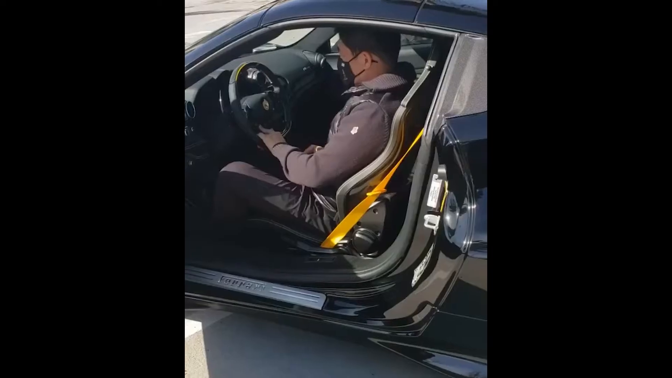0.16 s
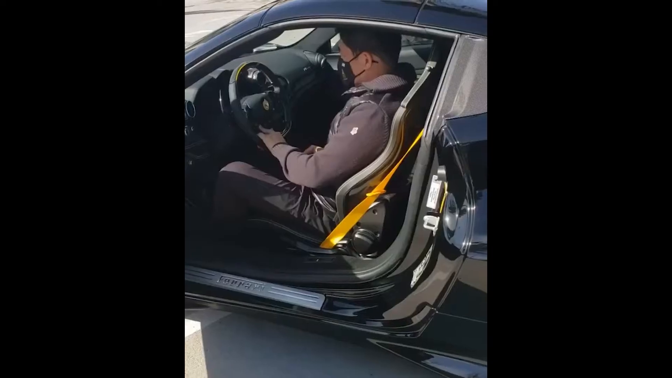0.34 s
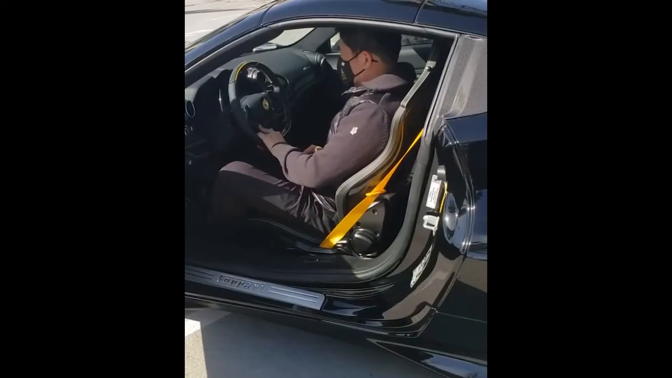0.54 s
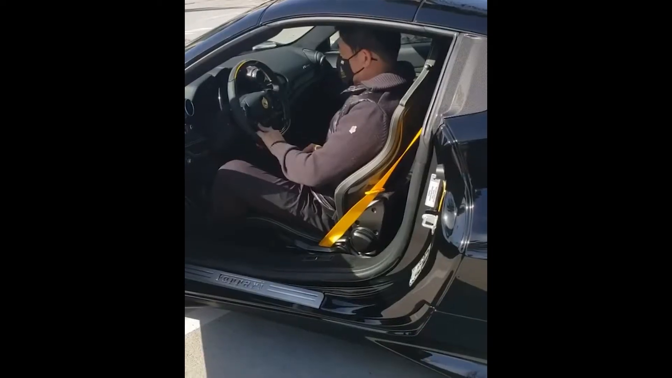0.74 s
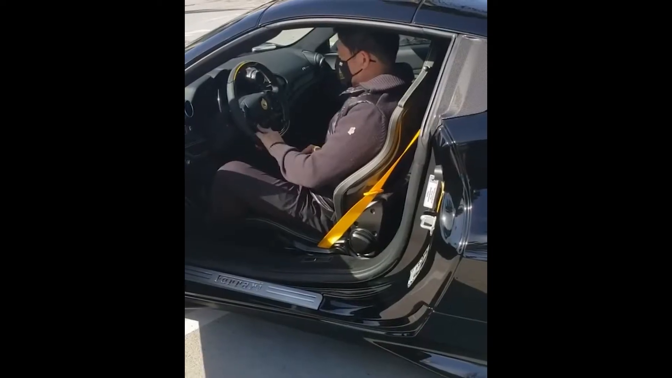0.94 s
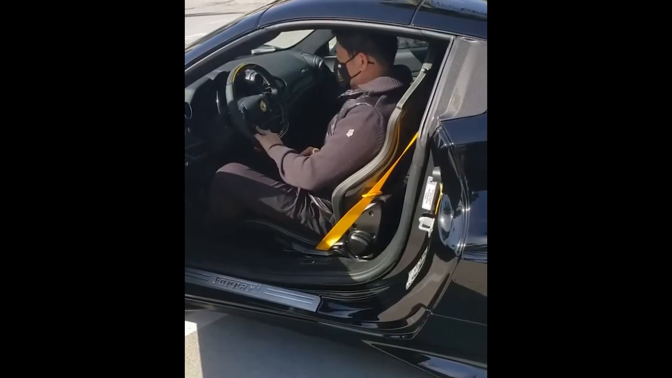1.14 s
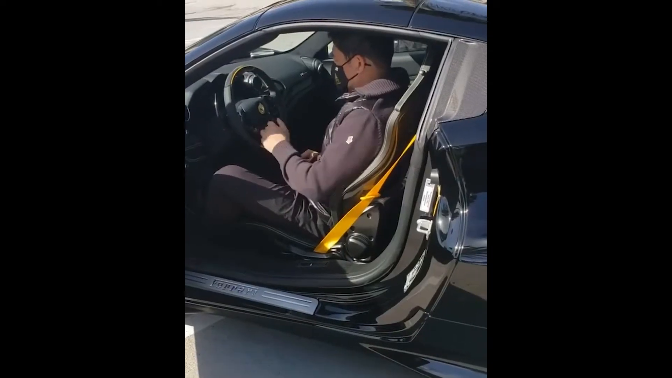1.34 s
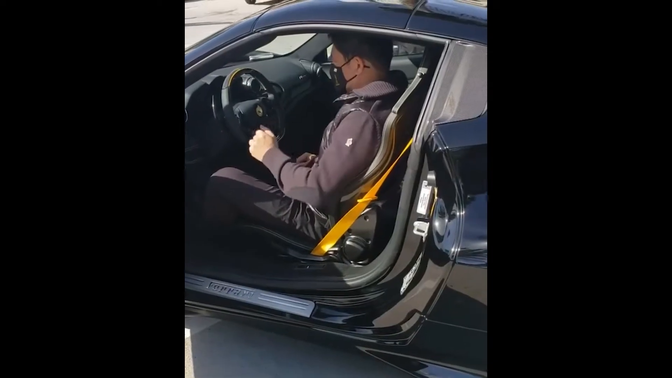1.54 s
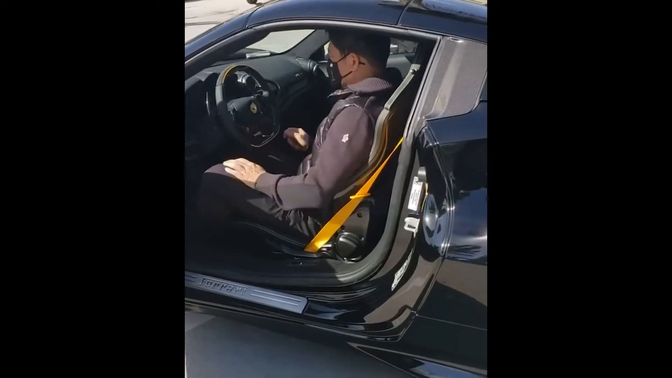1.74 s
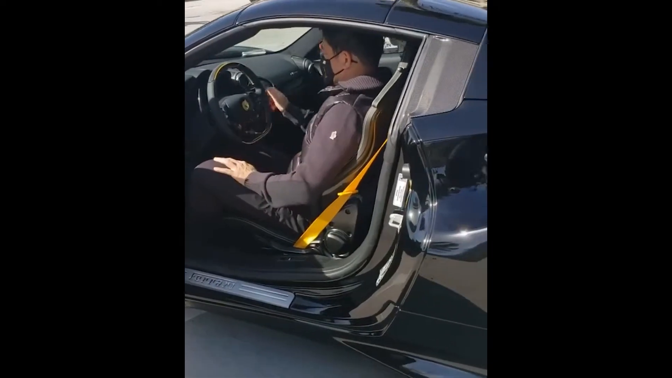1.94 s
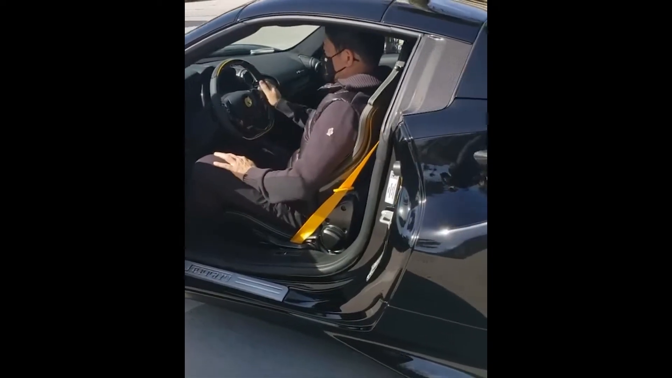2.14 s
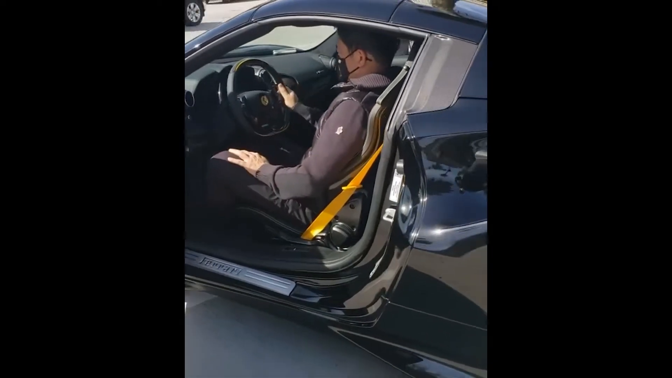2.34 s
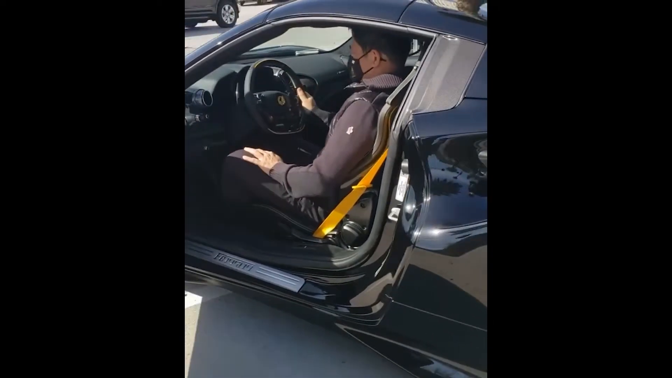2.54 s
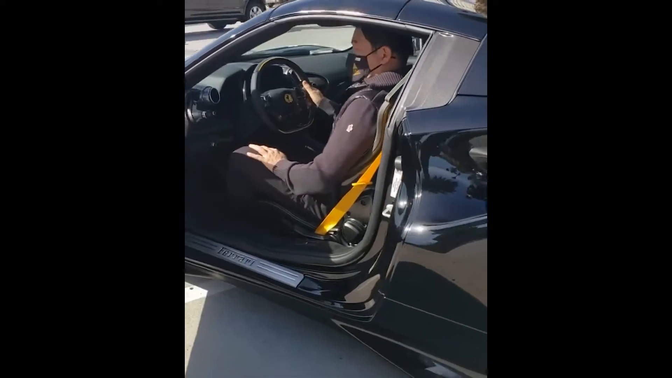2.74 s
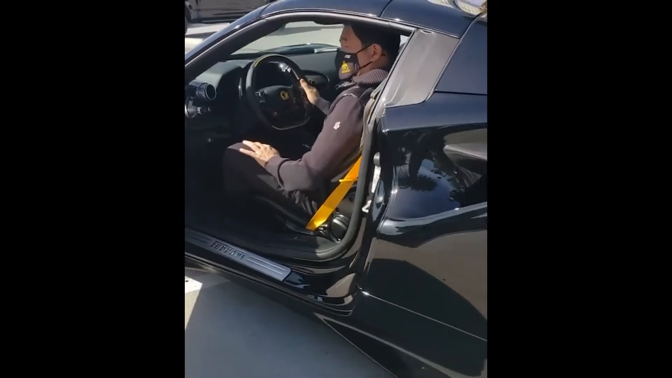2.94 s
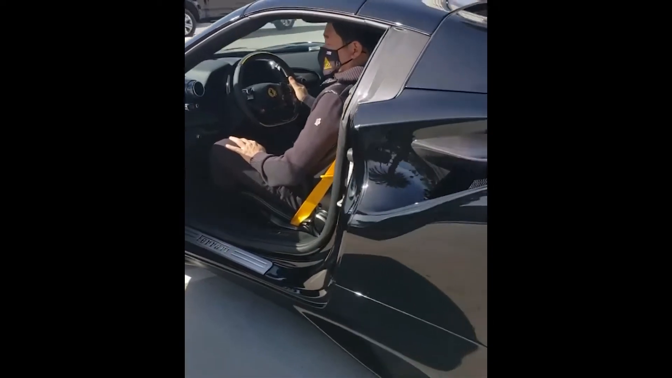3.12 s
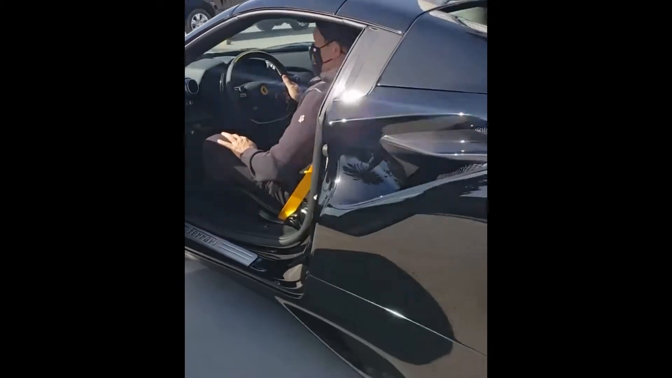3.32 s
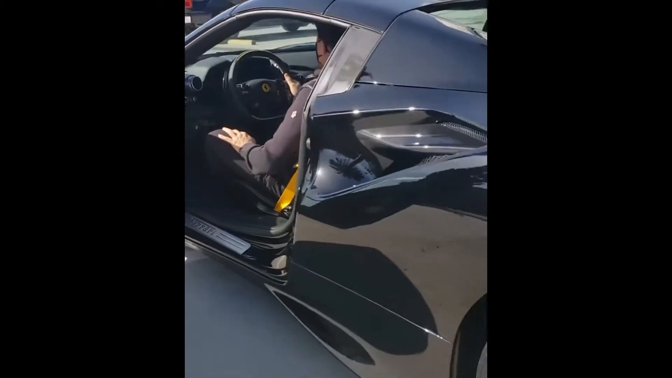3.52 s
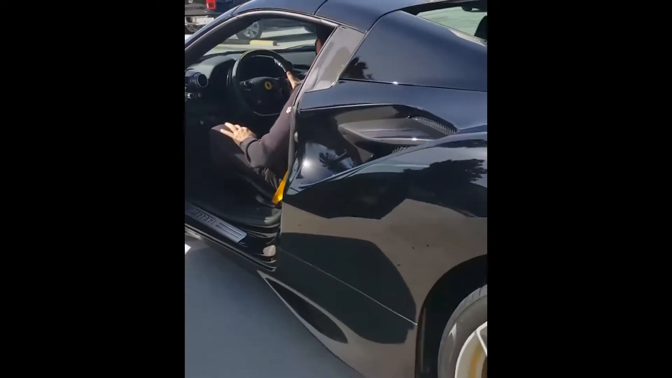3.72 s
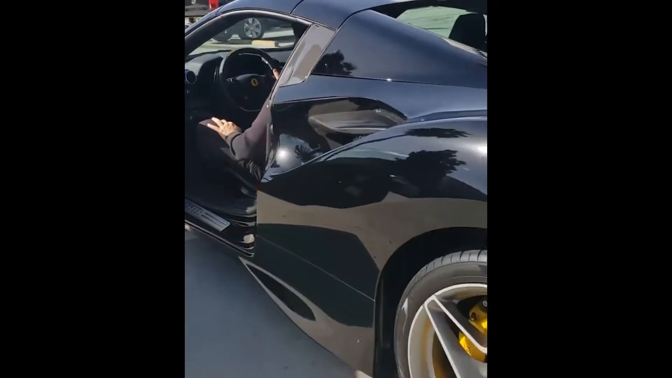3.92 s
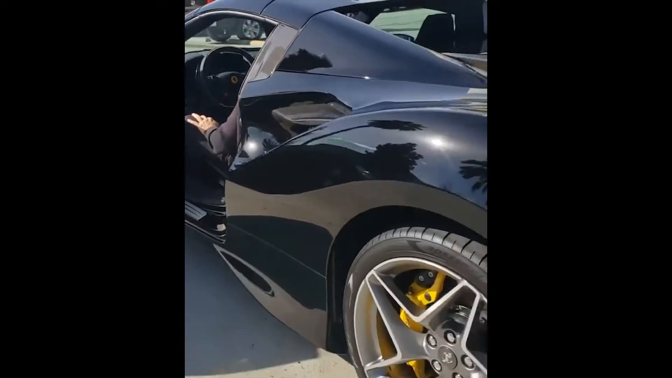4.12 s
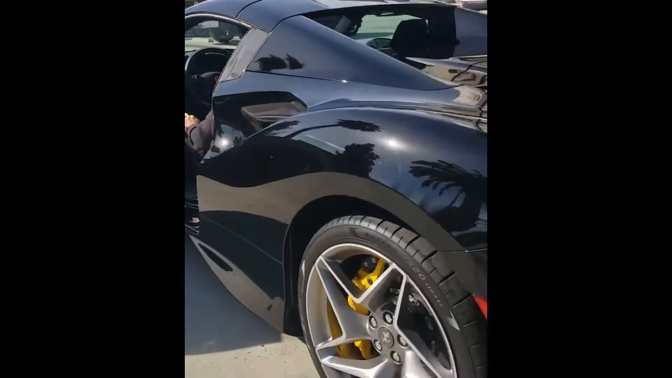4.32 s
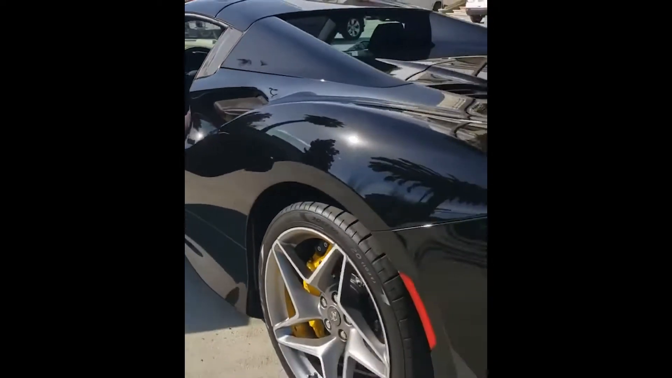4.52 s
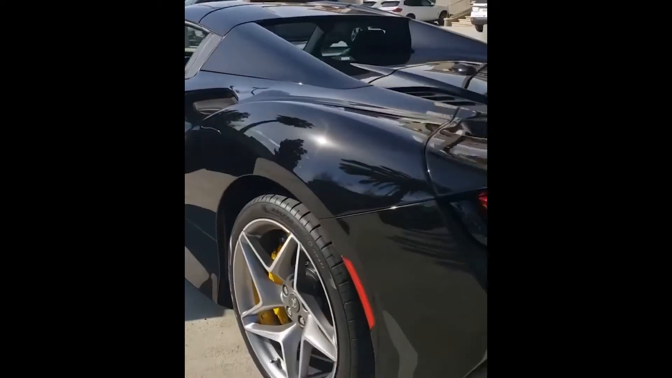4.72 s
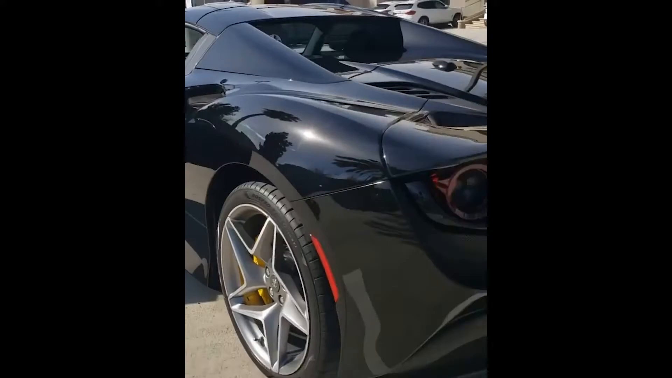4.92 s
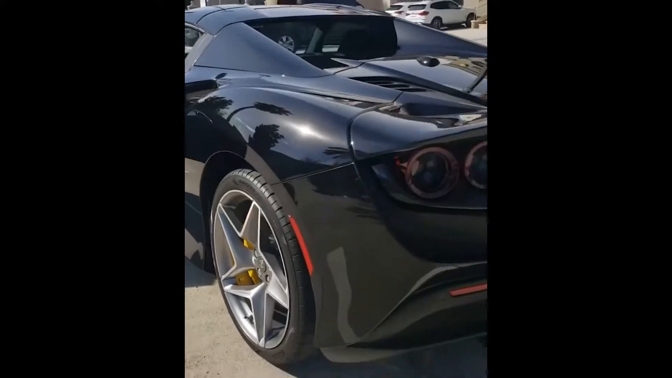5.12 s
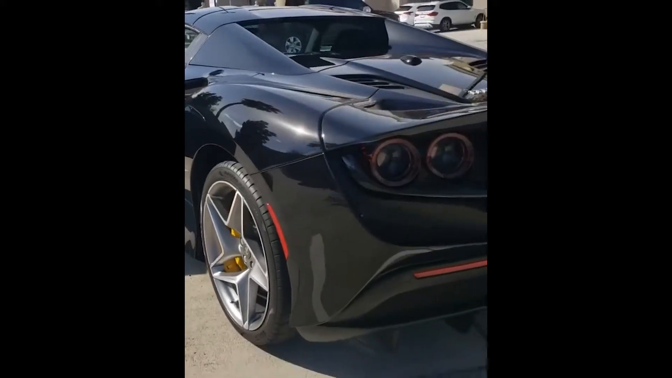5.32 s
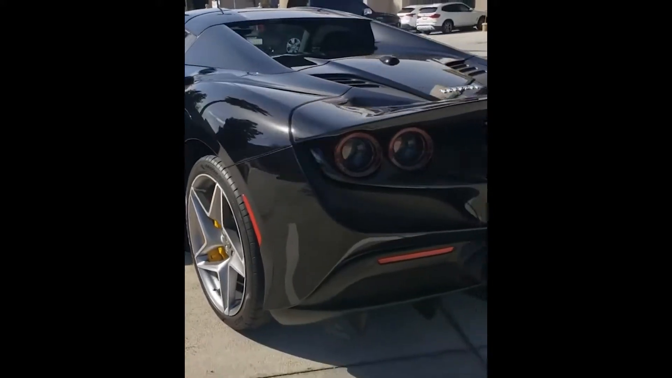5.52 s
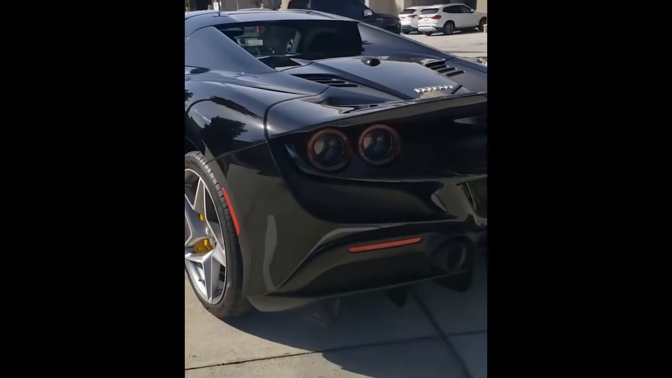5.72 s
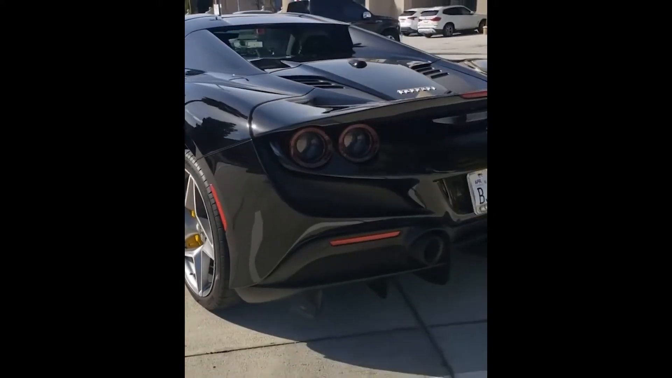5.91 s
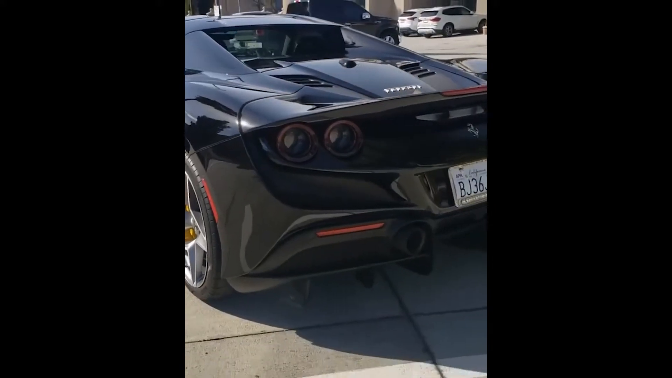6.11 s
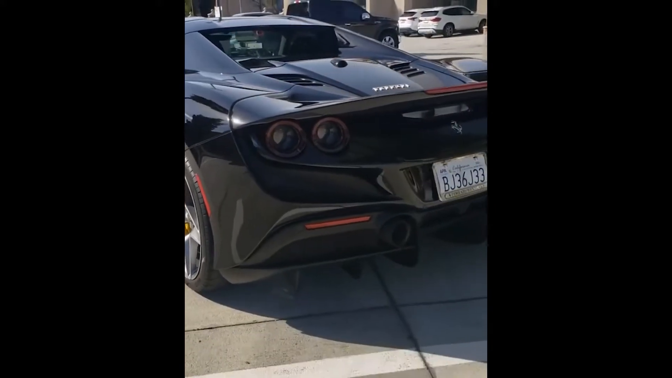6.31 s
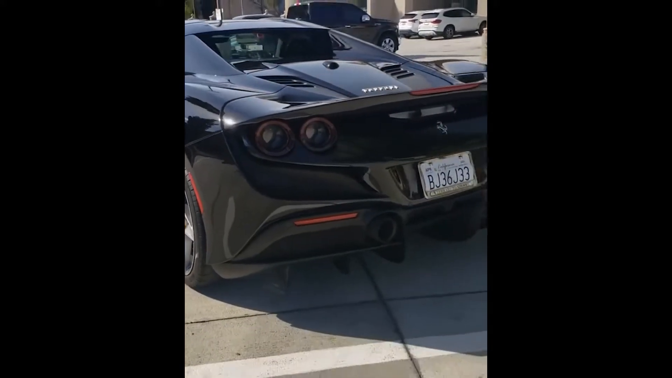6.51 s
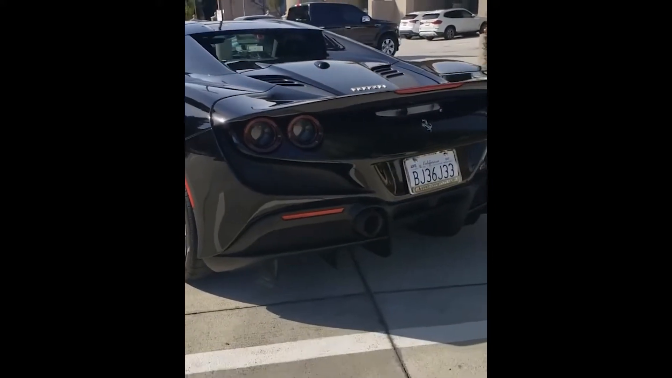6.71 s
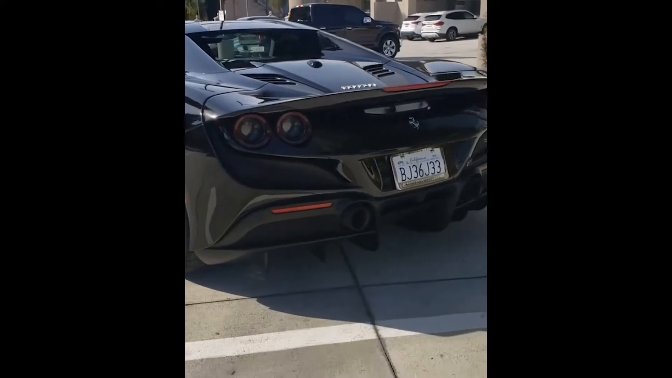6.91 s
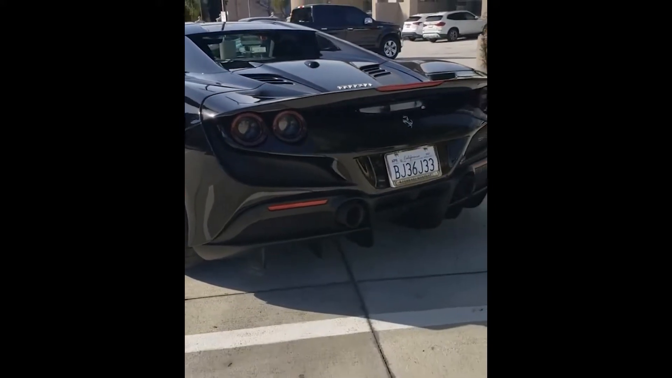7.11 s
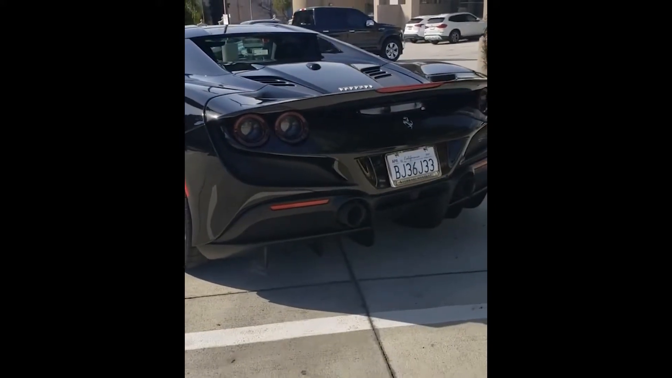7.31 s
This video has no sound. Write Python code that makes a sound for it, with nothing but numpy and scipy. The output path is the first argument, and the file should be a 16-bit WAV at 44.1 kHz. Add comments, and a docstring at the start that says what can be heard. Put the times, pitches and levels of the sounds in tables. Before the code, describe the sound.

An outdoor parking lot, with a soft low hum and bassy distant traffic. At about 0.55 s a starter clashes metallically and grinds with a gritty whir, pulsing with the compression strokes. Around 1.03-1.1 s heavy exhaust thumps mark a V8 catching; it flares to a peak near 1.4 s, then sinks by 2 s into a fast, deep, fluttering idle with valve ticking and fine hiss. From 3.4 to 5.2 s the stereo microphone walks from open door to tailpipes: the hollow rasp grows, reflections shift its colour, and small dry pops scatter, clustering around 4.3-5.6 s. A sharp click comes at 5.26 s. At 5.8 s the throttle opens; pitch climbs rapidly to a raspy snarl near 6.5 s. It shuts, revs falling with a thin descending turbo whistle, low burbles around 6.9 s and a loud pop at 7.0 s, still coasting down at the 7.35 s end.

```python
"""A low hum and distant traffic lie over a parking lot; then a starter clashes and grinds, and a twin-turbo V8 catches.
The engine flares and settles to a fast idle while the listener walks from the open door to the tailpipes.
A throttle blip brings a snarl, then burbles, pops and a fading turbo whistle.
One count of firings times the engine: harmonics make the boom, ringing pipes and gas noise the rasp.
Shaped noise makes the hiss, grind and traffic; short decays make the pops, gas slugs and click."""
import sys
import numpy as np
from scipy import signal
from scipy.fft import rfft, irfft, next_fast_len
from scipy.io import wavfile
from scipy.ndimage import uniform_filter1d, minimum_filter1d, map_coordinates

SR = 44100
rng = np.random.default_rng(int(sys.argv[2]) if len(sys.argv) > 2 else 0)


def dump(signal):
    """Clip the signal to [-1, 1] and save it as 16-bit WAV at the path in sys.argv[1]."""
    limited = np.clip(np.atleast_2d(signal).T, -1, 1)
    pcm = np.round(limited * 32767).astype(np.int16)
    wavfile.write(sys.argv[1], SR, pcm)


N = 324339
FUEL_CUT_S, CUT_FALL_S, RESUME_S = 6.88, 0.1, 1  # start of the fuel cut, time to fall, time to return


def amp(db):
    """Turn decibels into a gain."""
    return np.exp(np.log(10) * np.asarray(db) / 20)


def unit(x):
    """Scale to an rms (average strength) of 1."""
    return x / np.sqrt(np.mean(x ** 2) + 1e-20)


def clock():
    """The time of each sample, in seconds."""
    return np.arange(N) / SR


def along(points, hz):
    """Read a curve of (frequency, value) points on a log frequency axis."""
    f, v = np.transpose(points)
    return np.interp(np.log(hz + 1), np.log(f + 1), v)


def curves(rows):
    """Turn each column after the time into one value per sample."""
    s, *cols = np.transpose(rows)
    return [np.interp(clock(), s, c) for c in cols]


def ramp(start, end):
    """Rise from 0 to 1 between two times."""
    return np.clip((clock() - start) / max(end - start, 1 / SR), 0, 1)


def swells(rows):
    """Add up bell-shaped swells from rows of peak time, level and half-length."""
    return sum(amp(db) * np.exp(-((clock() - s) / width) ** 2 / 2) for s, db, width in rows)


def filtered(x, response):
    """Pass x through a filter given as a gain for each frequency."""
    m = next_fast_len(N + SR // 2)
    return irfft(rfft(x, m) * response(np.fft.rfftfreq(m, 1 / SR)), m)[..., :N]


def modes(rows, hz):
    """Response of several resonances, each given by its frequency, width and level."""
    total = 0
    for k, (center, width, db) in enumerate(rows):
        damping = 1j * hz * width
        total = total + (-1) ** k * amp(db) * damping / (center * center - hz * hz + damping)
    return total


def per_firing(cycle):
    """A smooth random curve with one new value each time the count goes up by one."""
    return map_coordinates(rng.standard_normal(int(cycle[-1]) + 4), [cycle], order=2)


# how alike the noise is at the two ears: (frequency [Hz], coherence [-1 to 1])
EAR_LIKENESS = [(200, 1), (500, 1), (1000, 0.58), (2000, 0.056), (4000, 0.028), (12000, 0.039)]


def rush(spectrum):
    """Stereo noise with a given spectrum: the same at both ears in the bass, wide in the treble."""
    def turn(hz):
        return np.arccos(np.clip(along(EAR_LIKENESS, hz), -1, 1)) / 2

    def mid_and_side(hz):
        return amp(along(spectrum, hz)) * [np.cos(turn(hz)), np.sin(turn(hz))]

    mid, side = filtered(rng.standard_normal((2, N)), mid_and_side)
    return np.array([mid + side, mid - side]) / np.std(mid)


def spread(x, wet_db=-9):
    """Ground and bodywork scatter a short, different tail to each ear."""
    t = np.arange(SR // 4) / SR
    tail = rng.standard_normal((2, len(t))) * amp(-60 * t / .08)  # dies by 60 dB in 0.08 s
    return x + amp(wet_db) * signal.fftconvolve(x[None], tail / np.linalg.norm(tail[0]), axes=1)[:, :N]


def walked():
    """Where the listener is: 0 at the open door, about 0.5 at the rear wheel, 1 behind the car."""
    return ramp(3.42, 5.15)


# how fast one bank of cylinders fires, twice the crank speed: (time [s], firing rate [Hz])
BANK_RATE = [(1.1, 44.98), (1.15, 60.94), (1.22, 72.6), (1.38, 83.05), (1.52, 77.3), (1.74, 61.7),
             (1.93, 56.32), (2.23, 56.06), (2.44, 53.72), (2.98, 52.58), (3.17, 49.25), (3.47, 53.26),
             (3.95, 50.77), (5.19, 52.05), (5.75, 51.25), (5.87, 61.74), (6.08, 100.2), (6.2, 121.9),
             (6.3, 145.4), (6.4, 172), (6.462, 194), (6.58, 192.5), (6.93, 162.1), (7.09, 131.3),
             (7.35, 101.7)]


def firing_rate():
    """Firings per second of one bank, which set the pitch of the engine."""
    return curves(BANK_RATE)[0]


def revs(idle_hz=52):
    """Engine speed in octaves above idle."""
    return np.log2(firing_rate() / idle_hz)


# the throttle for the start-up flare, then the blip:
# (starts opening [s], fully open [s], starts shutting [s], opening [0-1])
THROTTLE_MOVES = [(1.0, 1.126, 1.45, .4), (5.8, 6.278, 6.55, 1)]
SHUT_S = 0.12  # time the throttle takes to close


def load():
    """How far the throttle is open, 0-1."""
    total = 0
    for opens, full, shuts, opening in THROTTLE_MOVES:
        total = total + opening * ramp(opens, full) * (1 - ramp(shuts, shuts + SHUT_S))
    return np.clip(total, 0, 1)


def overrun():
    """Rises to 1 as the blip ends and the engine coasts down."""
    shuts = THROTTLE_MOVES[-1][2]
    return ramp(shuts, shuts + SHUT_S)


def starved():
    """How much of the fuel is cut, 0-1; it falls away quickly and is slowly fed back in."""
    empty = FUEL_CUT_S + CUT_FALL_S
    return ramp(FUEL_CUT_S, empty) * (1 - ramp(empty, empty + RESUME_S))


# noise colour of the distant traffic: (frequency [Hz], relative level per Hz [dB])
TRAFFIC_COLOUR = [(20, -11), (60, 1.5), (145, 0), (550, -11), (1400, -17.5), (6000, -36.5), (7500, -44),
                  (13000, -47)]


def parking_lot(air_db=-37.5, hum_hz=143, hum_db=-39):
    """Distant traffic is bassy noise, with a low wavering tone for the hum."""
    hum = np.sin(2 * np.pi * hum_hz * clock() + 0.49 * per_firing(10 * clock()))
    return amp(air_db) * rush(TRAFFIC_COLOUR) + amp(hum_db) * hum


# the starter's clashes: (time [s], level [dB], decay time [s])
TOOTH_CLASHES = [(0.553, -22, 0.021), (0.567, -22, 0.013), (0.894, -27, 0.018), (0.957, -33, 0.019),
                 (0.984, -34, 0.0067)]


def clashes(rise_s=0.0046):
    """The loudness of the clashing teeth: each clash strikes hard and dies away."""
    out = 0
    for s, db, decay_s in TOOTH_CLASHES:
        t = np.maximum(clock() - s, 0)
        out = out + amp(db) * (1 - np.exp(-(t / rise_s) ** 2)) * np.exp(-t / decay_s)
    return out


# ringing of the engine's metal parts: (frequency [Hz], width [Hz], relative level [dB])
METAL_RINGS = [(3350, 33, 2.5), (4730, 35, 4.5), (5240, 44, -1), (5640, 42, -3.5)]


def metal():
    """Noise shakes the metal parts, which ring steadily at their own pitches."""
    return unit(filtered(rng.standard_normal((2, N)), lambda hz: modes(METAL_RINGS, hz)))


def churned(x, patchy_db):
    """The colour shifts from moment to moment, as different teeth and parts ring."""
    z = signal.stft(x, nperseg=512)[2]
    field = uniform_filter1d(rng.standard_normal(z.shape[1:]), size=4, axis=0)  # smooth over frequency
    field = uniform_filter1d(field, size=7, axis=1)  # smooth over time
    return signal.istft(z * amp(patchy_db * unit(field)), nperseg=512)[1][:, :N]


# noise colour of the grinding gears: (frequency [Hz], relative level per Hz [dB])
GRIND_COLOUR = [(150, -5), (400, 2), (700, -8), (1020, 0), (1400, -4.5), (2400, -7), (3400, -7),
                (4800, -4.5), (5800, -10.5), (7500, -9.5), (9000, -16.5), (13000, -15.5)]
# ringing of the starter's ring gear: (frequency [Hz], width [Hz], relative level [dB])
GEAR_RINGS = [(1440, 180, 3.5), (3320, 400, -1.5), (3950, 120, 2), (4580, 120, 4), (5340, 190, 2),
              (6270, 210, -2)]


def starter(grind_db=-38, ring_db=-8, whir_hz=1050, whir_db=-11, whir_waver=1.6, stroke_hz=10.7,
            labour_db=1.2, spin_up_db=2, gear_db=-1, scrape_db=-5):
    """The pinion clashes and grinds on the ring gear over a whir, labouring at each compression stroke.

    The grind fades as the engine runs away from it."""
    strokes = np.cos(2 * np.pi * stroke_hz * (clock() - GAS_SLUGS[0][0]))
    grind = amp(grind_db + labour_db * strokes + spin_up_db * ramp(.9, 1.02))
    grind = grind * ramp(.545, .6) * (1 - ramp(1.03, 1.18))
    # quick and slow random changes in strength
    teeth = unit(amp(1.9 * per_firing(260 * clock()) + .5 * per_firing(25 * clock())))
    whir = amp(whir_db) * np.sin(2 * np.pi * whir_hz * clock() + whir_waver * per_firing(90 * clock()))
    scrape = rush([(300, 7.0), (1500, 3), (2300, -23), (3500, -7.0), (13000, -2.5)])
    gear = unit(filtered(rng.standard_normal((2, N)), lambda hz: modes(GEAR_RINGS, hz)))
    mesh = churned(rush(GRIND_COLOUR) + amp(ring_db) * metal(), patchy_db=2.8)
    clash = clashes() * (amp(gear_db) * gear + amp(scrape_db) * scrape)
    return teeth * (grind * (mesh + whir) + clash)


# the catch, and single slugs of gas in the pipes from cranking to coasting:
# (time [s], level [dB], ring frequency [Hz], time to die by 60 dB [s])
GAS_SLUGS = [(0.713, -12, 74.2, 0.27), (0.806, -20, 75, 0.25), (1.027, -1, 82.6, 0.17),
             (1.061, 2, 62, 0.19), (1.092, 6, 82, .08), (6.24, 7, 80, 0.048), (6.312, -2.5, 79, 0.079),
             (6.48, 3, 91, 0.096), (6.879, 2, 80, 0.098), (6.905, -3, 149.9, 0.11), (6.981, -7, 71.9, 0.16)]


def thumps(rise_s=0.0085):
    """A slug of gas swells and rings out at the exhaust's lowest resonance."""
    out = np.zeros(N)
    for s, db, hz, t60 in GAS_SLUGS:
        t = np.maximum(clock() - s, 0)
        swell = amp(db - 60 * t / t60) * (1 - np.exp(-(t / rise_s) ** 2))
        out -= swell * np.sin(2 * np.pi * hz * t)
    return out


# resonances of the tailpipes: (frequency [Hz], width [Hz],
# relative level at the door [dB], at the rear wheel [dB], behind [dB])
PIPE_RINGS = [(403, 41, -6, -56, -8), (508, 44, -12.5, -11, -6), (643, 77, -4, 1, -1.5),
              (752, 41, -3.5, -8.5, -6.5), (826, 43, -11, -24, 1.5), (930, 86, -35, -31.5, -5),
              (1128, 380, -18, -27, -11.5), (1336, 160, -24, -24, -27)]


def tailpipes(x, cut_hz=1450, drift_db=2, drift_hz=3):
    """The pipes ring, balanced by where the listener is; each ring drifts, the whole keeps a steady level."""
    where, heard = walked(), 0
    for k, (hz, width, *heard_db) in enumerate(PIPE_RINGS):
        knots = rng.standard_normal(N // SR * 10)
        drift = np.interp(drift_hz * clock(), np.arange(len(knots)), knots)
        gain = amp(np.interp(where, [0, .5, 1], heard_db) + drift_db * drift)
        heard = heard + (-1) ** k * gain * signal.lfilter(*signal.iirpeak(hz, hz / width, fs=SR), x)
    ring = signal.sosfilt(signal.butter(N=6, Wn=cut_hz, fs=SR, output="sos"), heard)
    power = np.abs(uniform_filter1d(ring ** 2, size=SR // 5))
    return ring / np.sqrt(power + 1e-12)


# the exhaust barks as the load changes: (peak time [s], added level over the rasp [dB], half-length [s])
LOAD_BARKS = [(1.61, -9, 0.038), (2.15, -6.5, 0.12), (3.62, -12, 0.15), (6.285, -3, 0.017)]


def rasp_level(door_db=-41.0, behind_db=5.0, octave_db=1, load_db=7.5, load_power=4, starved_db=-10):
    """The rasp grows towards the tail and with speed there, and leaps out near full throttle."""
    db = door_db + behind_db * np.sqrt(walked()) + octave_db * revs() * walked()
    db = db + load_db * load() ** load_power + starved_db * starved()
    return amp(db) * (1 + swells(LOAD_BARKS)) * np.sqrt(ramp(0.95, 1.28))


# noise colour of the gas rushing out: (frequency [Hz], relative level per Hz [dB])
GAS_COLOUR = [(150, -23), (260, -11), (380, -27), (520, 1.5), (650, 6), (900, 9), (1300, -2.5),
              (1600, -17.5), (2500, -14), (5000, -38)]
# the four cylinders of a bank fire unequally: [relative level in dB]
CYLINDER_LEVELS = [2, -0.5, 1, 3]


def rasp(cycle, clean, uneven, scatter_db=1.7, other_bank_db=-7, jitter_s=0.00062, pulse_db=-1.0,
         flow_db=-2, hollow_db=-2, puff_depth=0.94):
    """Each firing's sharp front rings the tailpipes and pushes out a puff of turbulent gas."""
    at = np.flatnonzero(np.diff(np.floor(np.maximum(2 * cycle - .65, 0))))  # firings of both banks
    size, delay = rng.standard_normal((len(at), 2)).T
    shift = (SR * jitter_s * uneven[at] ** 2 * delay).astype(int)
    arrival = np.clip(at + shift, 0, N - 1)
    # the banks take turns, and the far one is weaker
    turn = np.arange(len(at))
    cylinder_db = np.take(CYLINDER_LEVELS, turn // 2, mode="wrap")
    fronts = np.zeros(N)
    fronts[arrival] = amp(scatter_db * uneven[at] * np.minimum(size, 2) + cylinder_db + other_bank_db * (turn % 2))
    # the puff follows the front, fuller on the strong cylinders
    crank = np.pi * (cycle - .9)
    swell = unit(np.exp(puff_depth * (np.cos(2 * crank) + 0.27 * np.cos(crank))))
    # gas hisses both inside the pipes and at their mouths
    inside = amp(hollow_db) * tailpipes(rush(GAS_COLOUR) * swell)
    puffs = inside + amp(flow_db) * rush(GAS_COLOUR) * swell
    clean = np.clip(clean, 0, 1)
    mix = amp(pulse_db) * np.sqrt(clean) * spread(tailpipes(fronts)) + np.sqrt(1 - clean) * puffs
    return rasp_level() * mix


# the echo off a neighbouring car shifts as the listener walks: (time [s], delay [ms])
CAR_ECHO = [(3.3, 6), (3.8, 6.73), (4.4, 7.876), (5.5, 7.78)]


def echo(x, db=-7):
    """A single reflection whose changing delay sweeps peaks and notches through the sound."""
    late = np.arange(N) - curves(CAR_ECHO)[0] * SR / 1000
    reflection = np.array([np.interp(late, np.arange(N), ear) for ear in x])
    return (x + amp(db) * reflection) / np.sqrt(1 + amp(db) ** 2)


# noise colour of the low gurgle: (frequency [Hz], relative level per Hz [dB])
GURGLE_COLOUR = [(20, -27), (38, -31), (55, 2.5), (75, -3), (110, -3), (170, -4.5), (210, -10),
                 (270, -27.5), (400, -45), (700, -66.5)]


def burble(door_db=-24, behind_db=-2.0, load_db=-9, starved_db=6, stir_db=-23, stir_s=0.038):
    """Irregular low gurgle: smoothed by load, swollen by the fuel cut, stirred up by each gas slug."""
    steady_db = door_db + behind_db * walked() + load_db * np.sqrt(load()) + starved_db * starved()
    steady = amp(steady_db) * ramp(1.0, 1.025)
    stirred = 0
    for s, db, _, _ in GAS_SLUGS:
        stirred = stirred + amp(db + stir_db) * ramp(s, s + 0.0077) * np.exp(-np.abs(clock() - s - .02) / stir_s)
    return (steady + stirred) * rush(GURGLE_COLOUR)


def bay_levels(clatter_db=-53.5, clatter_behind_db=1.0, clatter_octave_db=4.0, cold_db=7, cold_s=0.39,
               fizz_db=-55, fizz_behind_db=-4.5, fizz_octave_db=3.0, coast_db=-7.5):
    """Clatter and fizz in dB: speed lifts them (the fizz only as the listener nears the tail), the fuel cut lowers
    them, and the valves clatter more until the oil arrives."""
    cold = np.exp(-np.maximum(clock() - BANK_RATE[0][0], 0) / cold_s)
    coast = coast_db * ramp(FUEL_CUT_S, FUEL_CUT_S + 0.51)
    clatter = clatter_db + clatter_behind_db * walked() + clatter_octave_db * revs() + cold_db * cold + coast
    fizz = fizz_db + (fizz_behind_db + fizz_octave_db * revs()) * walked() + coast
    return clatter, fizz


# noise colour of the ticking parts: (frequency [Hz], relative level per Hz [dB])
CLATTER_COLOUR = [(700, -23), (1400, -10), (3300, -3), (5000, -2.5), (9000, -15), (13000, -34)]
# noise colour of the intake's hiss: (frequency [Hz], relative level per Hz [dB])
FIZZ_COLOUR = [(6000, -29), (8000, -5.5), (9500, -8.5), (12000, 2.5), (14000, -4.5)]


def engine_bay(cycle, tick_db=5, tick_decay=5, tick_depth=0.29, clatter_db=-1.5, fizz_db=3.5, metal_db=-8,
               waver_db=1.5):
    """Valves and injectors tick in step with the firings, together with the hiss of the intake."""
    clatter, fizz = bay_levels()
    beat = 2 * cycle
    sizes = amp(tick_db * rng.standard_normal(int(beat[-1]) + 2))[beat.astype(int)]
    ticks = unit(1 + tick_depth * sizes * np.exp(-tick_decay * (beat % 1)))
    ticks = ticks * amp(waver_db * per_firing(cycle / len(CYLINDER_LEVELS)))
    parts = amp(clatter_db) * rush(CLATTER_COLOUR) + amp(metal_db) * metal()
    return (amp(clatter) * parts + amp(fizz + fizz_db) * rush(FIZZ_COLOUR)) * ticks * ramp(1.0, 1.15)


# what the muffler passes: (frequency [Hz], level at the door [dB], level behind [dB])
MUFFLER_PASS = [(50.3, -24.5, -25.5), (80, -13.5, -17), (101.5, -17, -12.5), (132, -22, -15.5),
                (153.3, -13.5, -18), (205, -18, -15), (237.5, -20.5, -25), (290, -22.5, -50.5),
                (340, -19, -28.5), (397, -40, -26.5), (517.1, -68.5, -48)]
# harmonics of the firing pulse at idle: (multiple of the firing rate, relative level [dB])
PULSE_HARMONICS = [(1, -0.5), (2, -0.5), (3, -0.5), (4, -16), (5, -11)]
# weak firings: (time [s], share of the pulse lost [0-1])
WEAK_FIRINGS = [(1.685, 0.46), (5.234, 0.98), (5.372, 0.3)]
# loping with the throttle shut, strong and weak firings alternating:
# (peak time [s], level [dB], half-length [s])
LOPING_SPELLS = [(6.645, -15, 0.026), (6.8, -21, 0.059), (7.19, -17.5, 0.048)]


def boom(cycle, uneven, size_scatter=0.022, timing_scatter=0.0066, blur=0.11, load_db=4.5, rounding_db=-1.0,
         overrun_db=1.5, starved_db=-15):
    """Muffled firing pulses: harmonics slide through the muffler's response, each firing a bit different."""
    phase = 2 * np.pi * (cycle + timing_scatter * uneven * per_firing(cycle))
    rate, where, octaves, tone = firing_rate(), walked(), revs(), 0
    hz, door, behind = np.transpose(MUFFLER_PASS)
    # at high speed the pulses of the two banks overlap and cancel the even harmonics
    overlap_db = np.interp(rate, [91.5, 145], [0, -19])
    for k, (_, db) in enumerate(PULSE_HARMONICS, 1):
        passed_db = (1 - where) * along(np.c_[hz, door], k * rate) + where * along(np.c_[hz, behind], k * rate)
        # the pulse gets rounder with speed
        pulse_db = db + rounding_db * (k - 1) * octaves + overlap_db * (k % 2 == 0)
        # the muffler's volume delays the fundamental
        lag = (k == 1) * np.pi / 3
        # at speed the odd harmonics lag, splitting each pulse into two humps
        lag = lag + (k % 2) * k * np.pi / 2 * octaves
        # no two pulses have quite the same shape
        lag = lag + blur * (k - 1) * uneven * per_firing(cycle)
        tone = tone + amp(pulse_db + passed_db) * np.cos(k * phase - lag)
    size = amp(load_db * load() ** 3 + overrun_db * overrun() + starved_db * starved())
    size = size * (1 + size_scatter * uneven * per_firing(cycle))
    for s, lost in WEAK_FIRINGS:
        size = size * (1 - lost * np.exp(-((clock() - s) / 0.013) ** 2))
    loping = swells(LOPING_SPELLS) * np.cos(phase / 2)
    return np.sqrt(2) * (tone * size + loping) * ramp(1.05, 1.084)


# knocks in the pipes: hard firings of one cylinder at idle, then pops as the throttle shuts and the fuel is
# cut: (time [s], level [dB], time to die by 60 dB [s])
PIPE_KNOCKS = [(1.553, -27, .04), (3.117, -30, .03), (3.791, -27, .035), (3.829, -25, .035),
               (4.279, -26, .04), (4.433, -25, .04), (4.512, -25, .035), (4.552, -23, .03),
               (4.59, -21.5, .04), (4.71, -26, .035), (4.787, -26, .03), (4.867, -28, .03),
               (4.943, -24, .035), (5.001, -25, .035), (5.077, -25, .035), (5.211, -26, .03),
               (5.519, -23, .04), (5.616, -26, .03), (6.486, -32, .09), (6.53, -31, .08), (6.881, -27.5, .06),
               (6.895, -28, .06), (6.911, -26, .06), (6.948, -35, .11), (7.004, -15.5, .03)]


def pops():
    """Burning gas knocks on the pipes, which ring briefly under a puff of noise."""
    blast, ring = np.zeros((2, N + SR))
    t, where = np.arange(SR // 8) / SR, walked()
    for (s, db, t60), chance in zip(PIPE_KNOCKS, rng.standard_normal((len(PIPE_KNOCKS), len(PIPE_RINGS)))):
        at = round(s * SR)
        fade = amp(db - 60 * t / t60) * (1 - np.exp(-t / .0008))
        # a long burn blows out more gas
        blast[at:at + len(t)] += amp(np.interp(t60, [.04, .06], [-5, 8])) * fade
        for (hz, _, *heard_db), luck in zip(PIPE_RINGS, chance):
            level = amp(np.interp(where[at], [0, .5, 1], heard_db))
            ring[at:at + len(t)] += fade * level * np.sin(2 * np.pi * hz * t + luck / 2)
    gas_colour = [(150, -20.0), (400, 10.5), (550, -5.0), (900, 8.0), (1250, 1), (1700, -13), (6000, -19.5),
                  (13000, -47)]
    return spread(ring[:N] + blast[:N] * rush(gas_colour)[0])


# noise colour of the air drawn in: (frequency [Hz], relative level per Hz [dB])
INTAKE_COLOUR = [(600, -25), (1150, 2), (2100, 14), (3200, 5), (6000, -29)]


def intake(db=-48, octave_db=9):
    """Air rushes through the turbos, swelling with engine speed and with the walk to the tail."""
    return amp(db + octave_db * (revs() - revs().max())) * walked() * rush(INTAKE_COLOUR)


def click(at_s=5.2633):
    """One sharp, dry click: a snap and a short thud, both plain decays."""
    t = np.maximum(np.arange(N) - round(at_s * SR), -1) / SR
    thud, snap = np.exp(-t / .003), np.exp(-t / .00004)
    return -.34 * (t >= 0) * (thud + .5 * snap)


# tones of the snarl, the halves coming from unequal cylinders:
# (multiple of the firing rate, relative level [dB])
SNARL_ORDERS = [(2, -11), (3, 0), (3.5, -9), (4, 0), (4.5, -10), (5, -2), (6, -2), (7, -8)]
# what the open exhaust valves pass: (frequency [Hz], relative level [dB])
VALVE_PASS = [(300, 1), (370, 7.5), (440, -12), (510, 2), (560, -6), (680, 0), (730, -7), (775, 2),
              (815, -2), (865, 6), (920, -2), (965, 5), (1030, -10), (1180, -5), (1500, -25)]


def snarl(cycle, db=-27.5, unloaded_db=-15, from_hz=85, full_hz=115, flutter_db=2.4, jitter=.011):
    """At speed, fluttering tones glide through the pipes' resonances and fade as the throttle shuts."""
    rate, tone = firing_rate(), 0
    phase = 2 * np.pi * (cycle + jitter * per_firing(cycle))
    for k, order_db in SNARL_ORDERS:
        flutter = flutter_db * per_firing(cycle / len(CYLINDER_LEVELS))
        # each order leaves the pipes with its own delay
        tone = tone + amp(order_db + along(VALVE_PASS, k * rate) + flutter) * np.cos(k * phase + k * k)
    opened = np.interp(rate, [from_hz, full_hz], [0, 1]) * (1 - starved())
    return spread(np.sqrt(2) * tone * opened * amp(db + unloaded_db * (1 - load() ** 2)))


# the turbo's whistle as it spools down: (time [s], frequency [Hz], level [dB])
TURBO_WHISTLE = [(6.2, 2200, -100), (6.45, 2080, -64), (6.68, 1850, -56), (6.76, 1785, -50),
                 (7.02, 1580, -55), (7.25, 1385, -63), (7.35, 1320, -72)]


def turbo(waver=0.45, flicker_db=3.5):
    """A thin, flickering whistle that falls as the turbine slows."""
    hz, db = curves(TURBO_WHISTLE)
    level = amp(db + flicker_db * per_firing(25 * clock()))
    phase = 2 * np.pi * np.cumsum(hz) / SR + waver * per_firing(60 * clock())
    return spread(np.sqrt(2) * level * np.sin(phase))


def scene(clean_door=.6, clean_behind=.7, clean_octave=-.18, clean_starved=.2, steadying=.7):
    """The engine's voices follow one count of firings; load evens the burn, the fuel cut makes it ragged."""
    cycle = np.cumsum(firing_rate()) / SR
    # the share of clear pulses in the rasp; the rest is gas noise
    clean = clean_door + (clean_behind - clean_door) * walked() + clean_octave * revs()
    clean = clean - clean_starved * starved()
    coasting = overrun() * (1 - ramp(FUEL_CUT_S - .2, FUEL_CUT_S))
    uneven = 1 - steadying * np.maximum(load(), coasting)
    exhaust = thumps() + echo(rasp(cycle, clean, uneven)) + burble() + boom(cycle, uneven) + pops() + snarl(cycle)
    return parking_lot() + starter() + exhaust + engine_bay(cycle) + intake() + click() + turbo()


# the treble leans right: (frequency [Hz], left minus right [dB])
TREBLE_LEAN = [(200, 0.4), (600, 1), (1500, -0.5), (3300, -3), (6400, -5.5), (12600, -5)]


def record(dry, lag_s=0.00011, top_hz=13200):
    """Smoothly limit the peaks, lean the treble right, delay left behind right and cut all above top_hz."""
    side = np.array([[.5], [-.5]])
    needed = np.minimum(1, .9 / (np.abs(dry).max(axis=0) + 1e-9))
    gain = uniform_filter1d(minimum_filter1d(needed, size=SR // 50), size=SR // 50)

    def ears(hz):
        delay = np.exp(-2j * np.pi * hz * lag_s * side)
        return amp(side * along(TREBLE_LEAN, hz)) * delay * (hz < top_hz)

    return filtered(dry * gain, ears)


dry = scene()
out = record(dry)
dump(out)
```